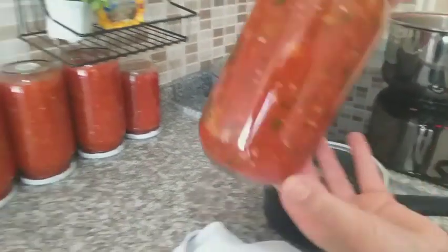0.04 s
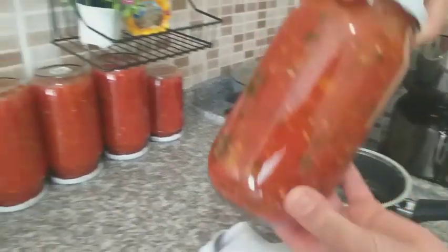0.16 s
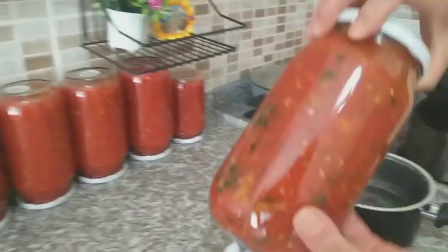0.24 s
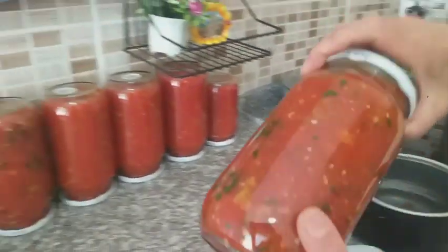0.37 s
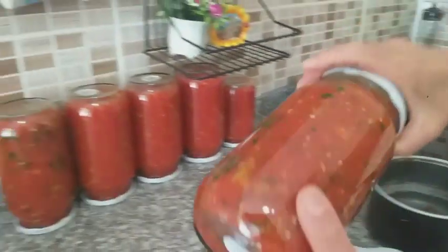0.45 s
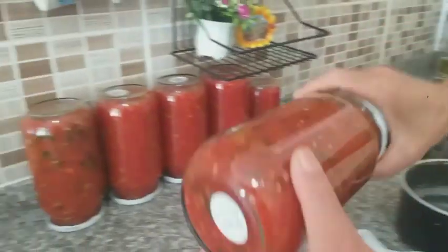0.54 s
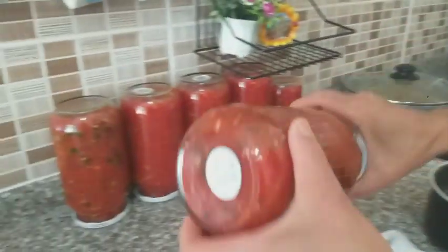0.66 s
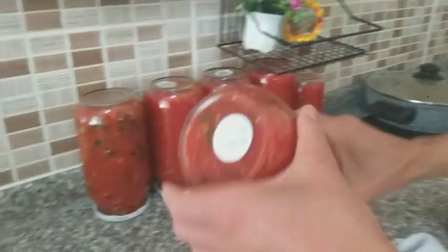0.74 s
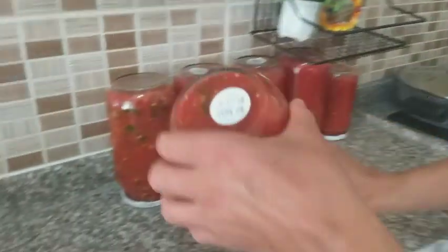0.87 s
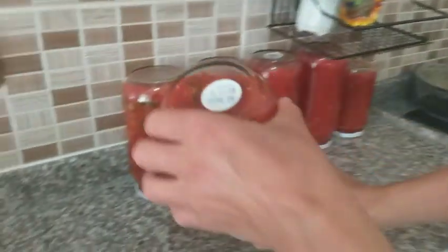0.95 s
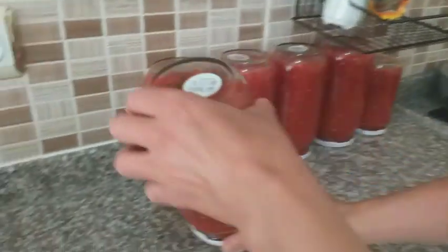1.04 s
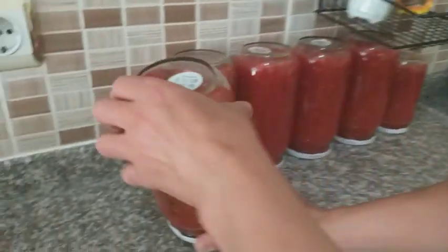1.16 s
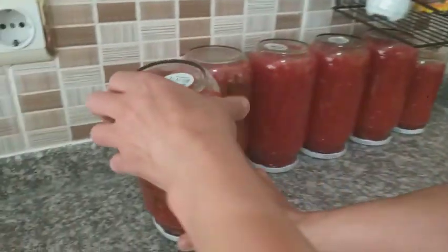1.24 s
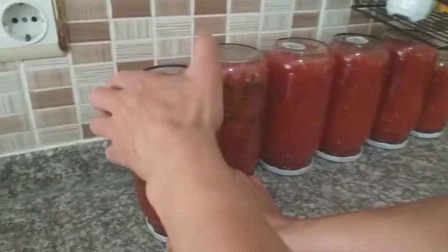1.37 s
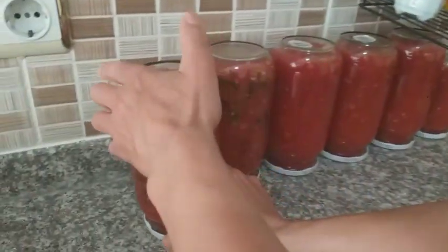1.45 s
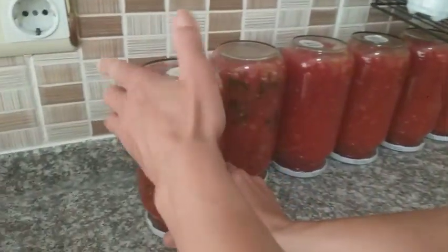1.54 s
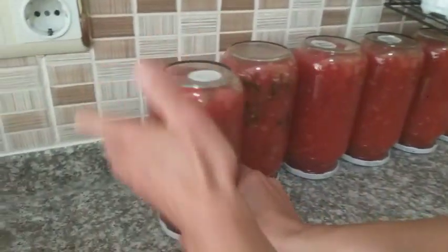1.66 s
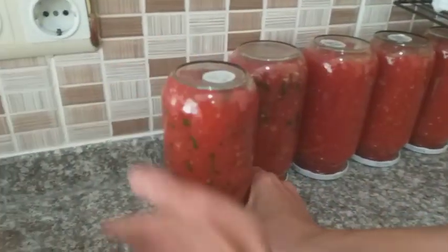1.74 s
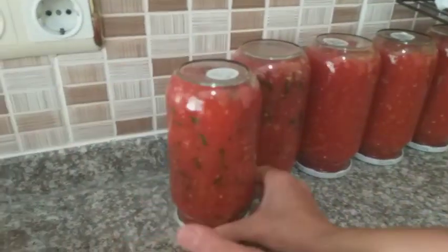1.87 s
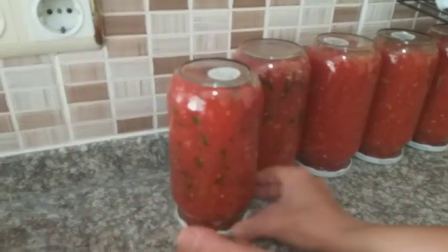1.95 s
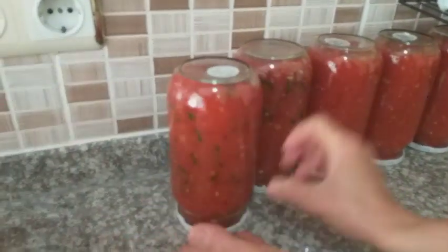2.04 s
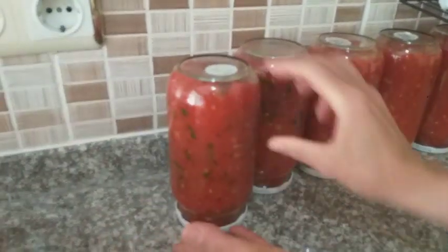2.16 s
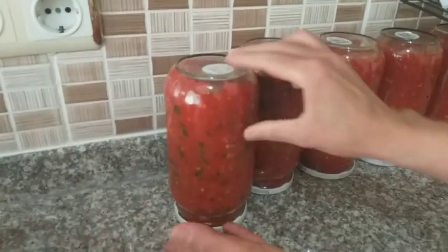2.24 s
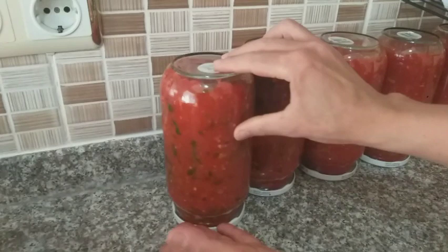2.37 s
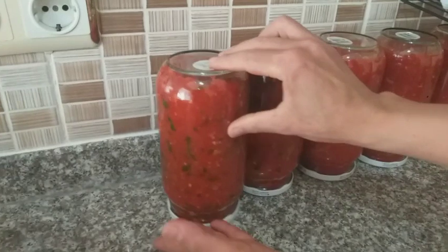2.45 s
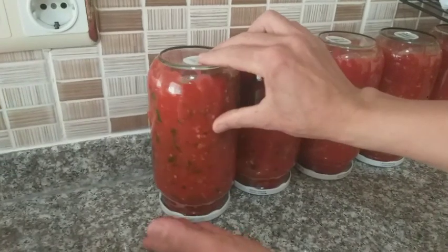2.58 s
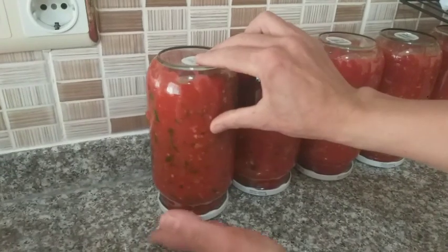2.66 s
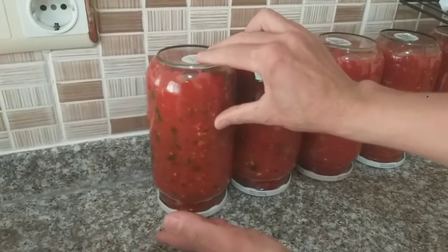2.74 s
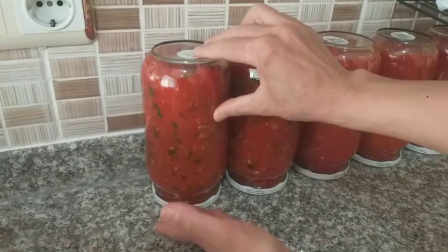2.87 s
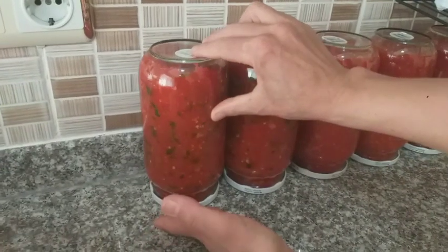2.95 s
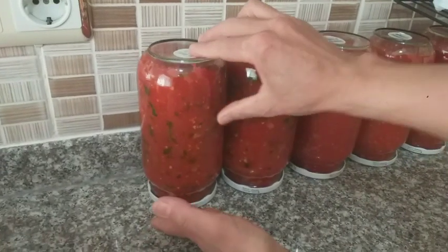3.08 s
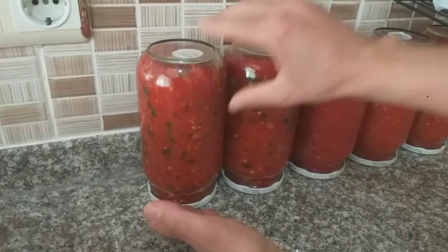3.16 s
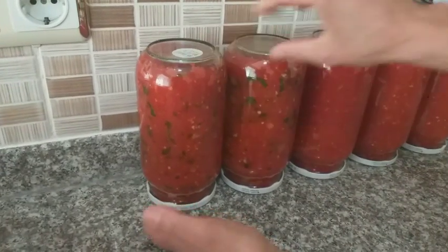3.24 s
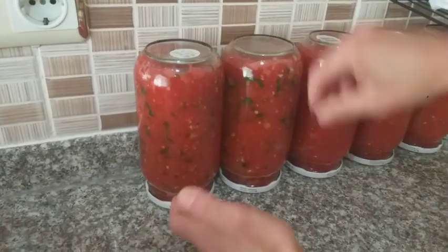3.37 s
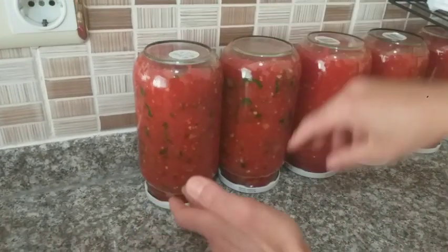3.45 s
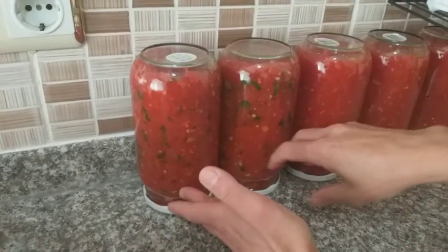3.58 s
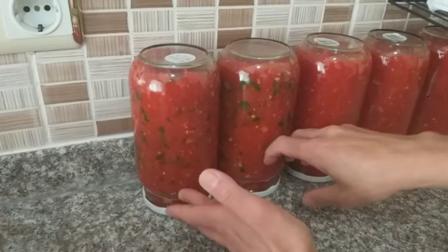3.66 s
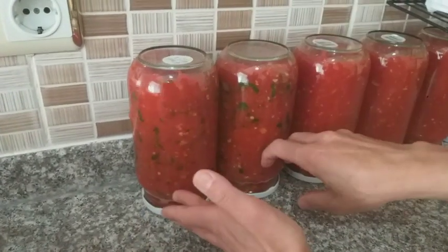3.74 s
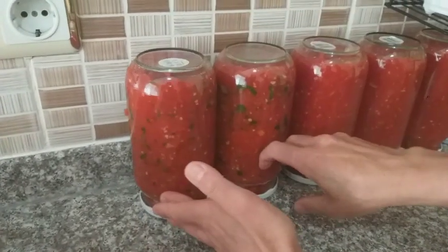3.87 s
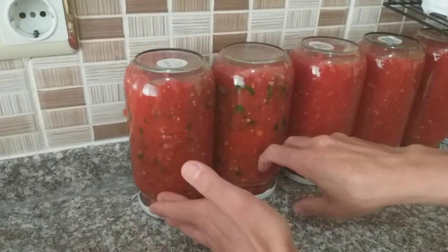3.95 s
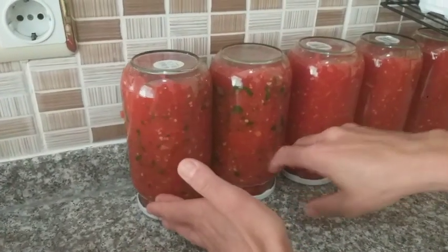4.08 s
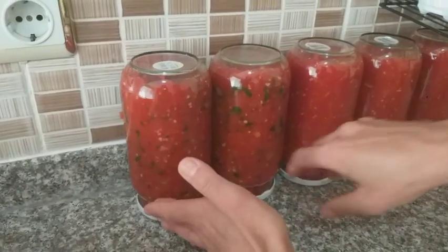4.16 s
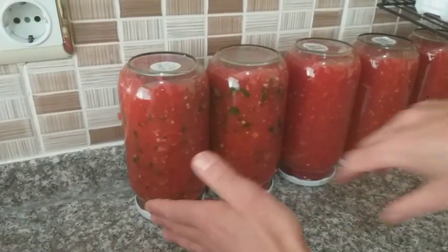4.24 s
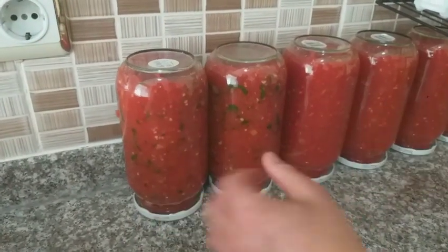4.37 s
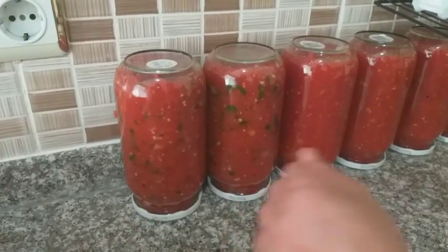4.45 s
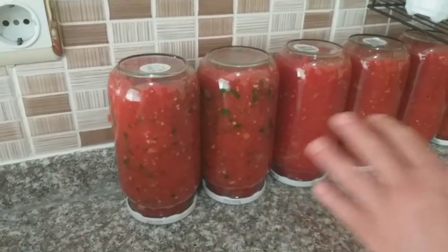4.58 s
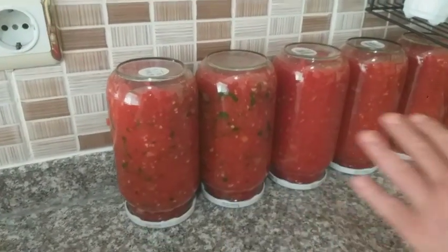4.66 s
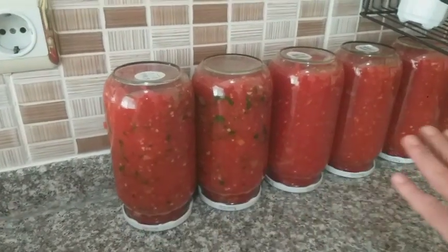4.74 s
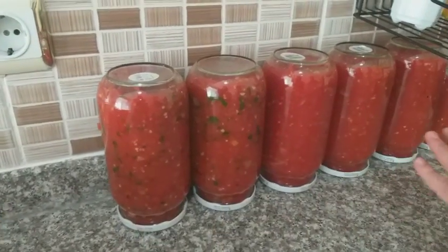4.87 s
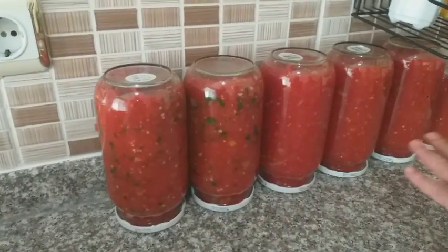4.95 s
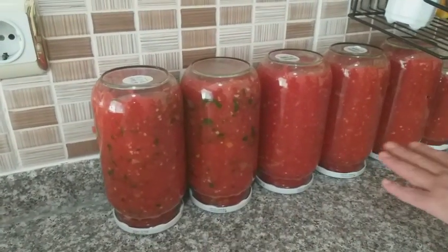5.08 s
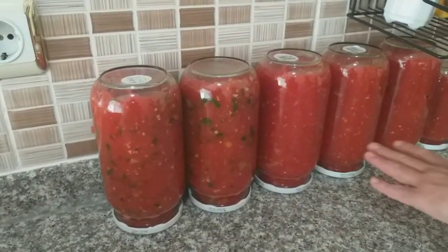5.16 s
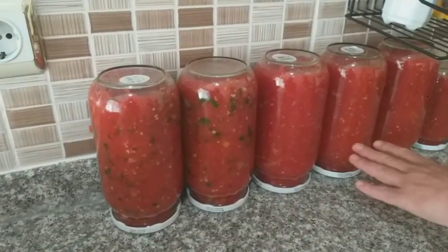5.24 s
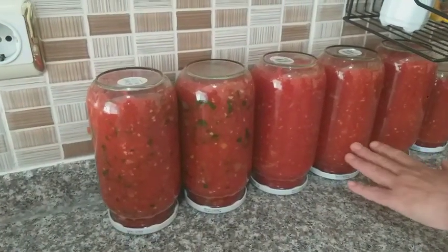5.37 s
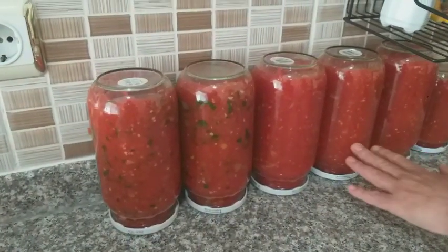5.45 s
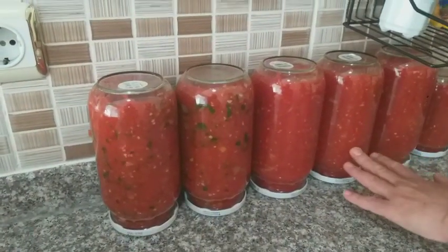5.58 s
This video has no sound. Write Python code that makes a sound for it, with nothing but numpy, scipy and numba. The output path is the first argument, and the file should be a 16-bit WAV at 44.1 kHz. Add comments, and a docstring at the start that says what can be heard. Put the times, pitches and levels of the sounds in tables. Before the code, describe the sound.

A heavy filled jar thuds onto stone, glass clinks sharply against glass, then a hand lightly brushes the counter in a softly hissing kitchen.

```python
"""A stove hisses and an appliance hums; then full glass jars knock, clink and tick on a stone counter near a phone.
Each knock or clink rings counter, cupboard, glass and lid as decaying sines, plus a crack of shaped noise.
Soft thumps ring only counter and cupboard; hands scrape and thud as enveloped noise; one buzz follows a knock.
A noise-built echo answers for the tiled kitchen; the background is shaped noise.
The phone limits the hardest knocks, cuts both ends of the spectrum and clips."""
import sys
import numpy as np
from scipy import signal
from scipy.fft import rfft, irfft
from scipy.io import wavfile
from scipy.ndimage import uniform_filter1d
from numba import njit

SR = 44100
rng = np.random.default_rng(int(sys.argv[2]) if len(sys.argv) > 2 else 0)


def pcm_store(signal):
    """Save signal as 16-bit PCM."""
    levels = np.round(np.clip(np.atleast_2d(signal), -1, 1) * 32767)
    wavfile.write(sys.argv[1], SR, levels.astype(np.int16).T)


N = 247613

# Jar lands or rocks on the stone: start_s, counter_db, cupboard_db, jar_db, wall_db, tick_db, lid_db
KNOCKS = [(1.4085, -8, -8, -14, -25, 0, -6), (1.4575, -14, -20, -17.5, -28.5, -22, -11.5),
          (1.4827, -12.5, -20, -38, -30, -28, -18.5), (1.496, -19, -16.5, -23, -36, -25, -27),
          (1.5407, -20, -28, -36, -33, -20, -27), (1.5968, -24, -41, -54, -40, -18, -28),
          (2.001, -25.5, -33, -55, -53, -12, -26.5), (2.8838, -20, -7, 2, -10, 11, -3),
          (3.6575, -28.5, -34.5, -29.5, -45, -47, -39)]
# Jar against jar: start_s, tick_db, lid_db, lid_pitch_hz, jar_db, wall_db, counter_db
CLINKS = [(2.161, 7.5, -10, 3480, -19, -26.5, -42), (2.1894, 5.5, -16, 3520, -41, -19.5, -29),
          (2.2015, -4, -22.5, 3930, -39, -34, -47), (2.3522, -5, -11.5, 3620, -34, -27, -28),
          (2.3741, -10, -21, 3240, -28, -29.5, -31), (2.5378, -0.5, -12.5, 3590, -28, -27.5, -25.5),
          (2.7082, -24.5, -25.5, 4080, -56, -68, -61), (2.7573, 15, -4, 3640, -24, -25, -27),
          (2.7831, -1.5, -14, 3970, -26, -21, -29), (2.7933, -1, -12.5, 3080, -27, -32.5, -24.5)]
# Hand or tilted jar bumps the counter softly: start_s, level_db
THUMPS = [(1.715, -27), (1.843, -28.5), (1.9576, -19), (2.3163, -23), (2.458, -30.5), (2.5984, -31),
          (2.7312, -40), (3.7001, -34)]
# Faint lone ticks: start_s, level_db
LONE_TICKS = [(5.4603, -14), (5.5767, -7.5)]

# Modes of each struck part, pitch before stretch and detuning: pitch_hz, level_db, t60_s
COUNTER_MODES = [(89, -22, 0.51), (115, -16, .15), (140.3, 7, 0.089), (170, 0.5, 0.11), (215.8, -3, 0.1)]
CUPBOARD_MODES = [(189, -6.5, 0.09), (228, -3.5, 0.1), (291, 1.5, 0.017), (360.6, -4.5, 0.14),
                  (417.7, -3.5, 0.061), (497.3, -9.5, 0.12), (576, 1.5, 0.029), (645, -15, 0.048)]
JAR_MODES = [(675.6, -18, 0.3), (777, -17, 0.47), (839, -13, 0.44), (738, 6, 0.027), (918, 5, 0.024),
             (1010, 1.5, 0.019)]
WALL_MODES = [(1152, 0, 0.051), (1259, 2.5, 0.091), (1335, 5.5, 0.0094), (1496, -4.5, 0.028),
              (1847, -8.5, 0.18), (2583, -0.5, 0.13)]  # jar wall
SHOULDER_MODES = [(1518, 6, 0.012), (1620, 4.5, 0.021), (1947, 0.5, 0.035), (1930, -12, 0.027),
                  (2082, -6.5, 0.063), (2334, 3, 0.018), (2607, 7, 0.018)]  # jar shoulder
LID_MODES = [(2740, -1.5, 0.0034), (3170, -6.5, 0.022), (3704, 5.5, 0.0055), (4104, -7, 0.012),
             (4380, -10, 0.01), (3540, -24, 0.04)]

# Crack of glass on glass or stone: pitch_hz, relative_db
TICK_TONE = [(2350, -15), (4000, -13.5), (5030, -8.5), (5430, -3), (5900, -13), (6250, -1), (7240, -2.5),
             (7770, 3), (9600, -7), (13500, -7), (15700, -16), (16300, -37)]
# What the snap of the rim passes on to the lid: pitch_hz, gain_db
RIM_TONE = [(1200, -37), (2500, 0), (6000, 3), (9000, -16)]
# Rattle of the jars against the tiles: pitch_hz, relative_db
BUZZ_TONE = [(900, -26), (1500, 7), (2500, -5), (4000, -3), (6000, -16), (9000, -34)]

# Palm brushes the counter: peak_s, scrape_db, thud_db, rise_s, fall_s (rise and fall are Gaussian widths)
BRUSH_STROKES = [(2.011, -36, -45.5, 0.0049, 0.017), (3.64, -49.5, -49.5, 0.0085, 0.054),
                 (4.81, -36.5, -44, .01, 0.018), (4.847, -30, -33, 0.018, 0.018),
                 (4.875, -46, -35, 0.013, 0.027), (5.331, -38.5, -58, 0.0039, 0.055)]
# Skin scraping on stone: pitch_hz, relative_db
SCRAPE_TONE = [(900, -20), (1400, -8.5), (1900, -0.5), (2630, 0.5), (4500, -8.5), (12400, -17),
               (15000, -18)]
# Weight of the hand: pitch_hz, relative_db
THUD_TONE = [(59, -37), (100, -4.5), (155, 2), (285, -12.5), (546, -8), (674, -14), (780, -4.5), (942, -15),
             (1500, -23)]

# Kitchen echo bands: pitch_hz, t60_s, level_db
KITCHEN_BANDS = [(135, 0.41, -8.5), (243.6, 0.57, -2), (485, 0.44, -1), (1060, 0.45, -3.5),
                 (1950, 0.41, -1), (4230, 0.24, -6.5), (8000, 0.3, -11.5), (14000, 0.56, -21)]

# Background levels before flicker: time_s, stove_hiss_db, skin_and_cloth_rustle_db
AIR_LEVELS = [(0.0, -40, -43), (0.19, -39.5, -40.5), (0.37, -41.5, -44), (0.6, -40, -42.5),
              (0.76, -38.5, -38), (1.05, -39.5, -39), (1.21, -37.5, -35.5), (1.34, -43.5, -42),
              (1.8, -42, -45.5), (2.05, -40, -43), (2.3, -40.5, -36), (2.45, -39, -43), (2.74, -42, -41),
              (3.27, -47, -50.5), (3.6, -43, -48), (4.33, -43.5, -47.5), (4.55, -37.5, -41.5),
              (4.8, -40, -37), (5.28, -40.5, -43), (5.61, -41.5, -45.5)]
# Appliance hum level: time_s, level_db
HUM_LEVELS = [(0.0, -42.5), (0.39, -44), (1.28, -44), (1.61, -37.5), (1.98, -41.5), (2.89, -36.5),
              (3.37, -48.5), (4.84, -41.5), (5.61, -46)]
# Background spectra: pitch_hz, relative_db
HISS_TONE = [(2650, -71), (4500, -78.5), (5740, -37.5), (6150, -2.5), (6810, 2), (8150, 6), (10100, -3.5),
             (12600, -2), (15000, -9), (16000, -46)]
RUSTLE_TONE = [(710, -10.5), (1200, -21), (1730, -13), (2200, -7.5), (2380, -6.5), (3100, 0), (3600, 2),
               (5000, -12), (6000, -10), (7800, -30), (13200, -120)]
HUM_TONE = [(15, -47), (25, -16), (48, -12.5), (64, -25), (83, -9.5), (102, 0.5), (118, -16.5), (129, -2),
            (145, 6.5), (161, -5), (173, -22.5), (211, -7.5), (244, -19), (300, -17.5), (390, -22),
            (660, -120)]
ROOM_TONE = [(150, -20.5), (250, -6), (436, -5), (476, -7), (748, -5.5), (938, -10), (1110, -8),
             (1600, -19), (2000, -5), (2600, -47), (4400, -120)]

# Bands where left and right differ: center_hz, width_hz, direct_db, scattered_db (half of left minus right)
PORT_BANDS = [(1930, 640, -11.5, -10.5), (9890, 1600, -18, -11)]
# Self-noise of the capsules: pitch_hz, relative_db
SELF_NOISE_TONE = [(60, 10), (130, -12), (300, -5), (700, -1.5), (1500, -9), (2000, -28)]

KNOCK_SHOULDER_DB, CLINK_SHOULDER_DB = 6, -1.5  # relative to the wall
CLINK_CUPBOARD_DB, THUMP_CUPBOARD_DB = -5, -21.5  # relative to the counter
KNOCK_LID_HZ = 3223
LID_REFERENCE_HZ = 3600  # pitch at which the lid modes are listed
BUZZ_START_S, BUZZ_DB, BUZZ_RISE_S, BUZZ_FALL_S = 2.89, -21.5, 0.015, 0.065
ROOM_TONE_DB, SELF_NOISE_DB = -56, -77.5
LIMIT_DB, ATTACK_S, RELEASE_S = -3.5, 0.0014, 0.019
LOW_CUT_HZ, HIGH_CUT_HZ = 38, 15700


def blows():
    """Knocks and clinks ring all parts; thumps ring counter and cupboard; lone ticks only crack."""
    out = np.zeros(N + SR)
    for start_s, counter_db, cupboard_db, jar_db, wall_db, tick_db, lid_db in KNOCKS:
        stone = (COUNTER_MODES, counter_db), (CUPBOARD_MODES, cupboard_db)
        add(out, start_s, body(*stone, *glass(jar_db, wall_db, KNOCK_SHOULDER_DB)), 0)
        add(out, start_s, tick(), tick_db)
        add(out, start_s, lid(KNOCK_LID_HZ), lid_db)
    for start_s, tick_db, lid_db, lid_hz, jar_db, wall_db, counter_db in CLINKS:
        stone = (COUNTER_MODES, counter_db), (CUPBOARD_MODES, counter_db + CLINK_CUPBOARD_DB)
        add(out, start_s, body(*stone, *glass(jar_db, wall_db, CLINK_SHOULDER_DB)), 0)
        add(out, start_s, tick(), tick_db)
        add(out, start_s, lid(lid_hz), lid_db)
    for start_s, level_db in THUMPS:
        add(out, start_s, body((COUNTER_MODES, 0), (CUPBOARD_MODES, THUMP_CUPBOARD_DB)), level_db)
    for start_s, level_db in LONE_TICKS:
        add(out, start_s, tick(), level_db)
    # a slab this size sends little deep bass into the air
    return signal.sosfilt(signal.butter(4, 78, "high", fs=SR, output="sos"), out[:N])


def glass(jar_db, wall_db, shoulder_db):
    """Glass parts with their levels; the shoulder follows the wall."""
    return (JAR_MODES, jar_db), (WALL_MODES, wall_db), (SHOULDER_MODES, wall_db + shoulder_db)


def body(*parts):
    """The mass of the jar or hand pushes once, smoothly, into each part at its level."""
    t = np.arange(256) / SR
    push = t * np.exp(-t / 0.00008)
    ringing = sum(undb(level_db) * ring(modes, spread_db=0.7) for modes, level_db in parts)
    return np.convolve(ringing, push / push.sum())[:len(ringing)]


def ring(modes, spread_db, stretch=0.98):
    """Decaying sines, neighbours in opposite phase; each blow lands elsewhere and weighs the modes anew."""
    pitch_hz, level_db, t60_s = np.transpose(modes)[:, :, None]
    t = np.arange(SR // 2) / SR
    # no two jars or spots are tuned alike
    pitch_hz = stretch * pitch_hz * (1 + 0.0074 * rng.standard_normal(pitch_hz.shape))
    sign = (-1) ** np.arange(len(modes))[:, None]
    size = sign * undb(level_db + spread_db * rng.standard_normal((len(modes), 1)))
    decay = np.exp(-np.log(1000) * t / t60_s)
    return (size * decay * np.sin(2 * np.pi * pitch_hz * t)).sum(axis=0)


def tick():
    """Crack of the first contact: a shaped crunch of unit energy."""
    crack = shape(crunch(sharp_s=0.0033, rattle_s=0.0091, rattle_db=-7), TICK_TONE)[:1400]
    return crack / np.linalg.norm(crack)


def lid(pitch_hz):
    """The snap of the rim rings the lid modes, scaled to the given pitch."""
    snap = shape(crunch(sharp_s=0.00017, rattle_s=0.003, rattle_db=-3), RIM_TONE)[:400]
    return np.convolve(ring(LID_MODES, spread_db=2, stretch=pitch_hz / LID_REFERENCE_HZ), snap)


def crunch(sharp_s, rattle_s, rattle_db):
    """The rim crunches on contact and rattles on: a two-decay noise burst with an evened spectrum."""
    t = np.arange(2048) / SR
    onset = 1 - np.exp(-t / 0.00025)
    decay = np.exp(-t / sharp_s) + undb(rattle_db) * np.exp(-t / rattle_s)
    spectrum = rfft(rng.standard_normal(len(t)) * onset * decay)
    return irfft(spectrum / uniform_filter1d(np.abs(spectrum), size=17))


def buzz():
    """After the hardest knock the row of jars buzzes on the tiles: rough noise, fast swell, decay."""
    t = np.maximum(np.arange(N) / SR - BUZZ_START_S, 0)
    swell = (1 - np.exp(-t / BUZZ_RISE_S)) * np.exp(-t / BUZZ_FALL_S)
    return undb(BUZZ_DB + 2.8 * walk(200)) * swell * noise(BUZZ_TONE)


def brush():
    """Short rough strokes of skin on stone: the skin scrapes, the weight of the hand thuds."""
    t = np.arange(N) / SR
    peak_s, scrape_db, thud_db, rise_s, fall_s = np.transpose(BRUSH_STROKES)[:, :, None]
    width_s = np.where(t < peak_s, rise_s, fall_s)
    stroke = np.exp(-0.5 * ((t - peak_s) / width_s) ** 2) * undb(0.92 * walk(150))
    scrape = (undb(scrape_db) * stroke).sum(axis=0) * noise(SCRAPE_TONE)
    thud = (undb(thud_db) * stroke).sum(axis=0) * noise(THUD_TONE)
    return scrape + thud


def kitchen(x):
    """Dense echo that builds up over a few ms and dies band by band."""
    t = np.arange(SR) / SR
    build_up = 1 - np.exp(-(t / 0.0046) ** 2)
    echo = 0
    for pitch_hz, t60_s, level_db in KITCHEN_BANDS:
        tail = rfft(rng.standard_normal(SR) * np.exp(-np.log(1000) * t / t60_s) * build_up)
        # the room's modes lie close and even, so no stretch of pitches is favoured
        tail = irfft(tail / np.sqrt(uniform_filter1d(np.abs(tail) ** 2, size=40)))
        band = [(pitch_hz / 2, -40), (pitch_hz / 1.41, 0), (pitch_hz * 1.41, 0), (pitch_hz * 2, -40)]
        echo = echo + undb(level_db) * shape(tail, band)
    return x + convolve(x, echo[:SR * 3 // 4])


def background():
    """Hiss, rustle and hum follow their levels over steady room tone; hiss and rustle also flicker."""
    hiss_db, rustle_db = curve(AIR_LEVELS)
    hum_db, = curve(HUM_LEVELS)
    flicker = walk(60)  # shared
    hiss = undb(hiss_db + flicker + 2 * walk(9)) * noise(HISS_TONE)
    rustle = undb(rustle_db + 0.51 * flicker + 0.57 * walk(50)) * noise(RUSTLE_TONE)
    hum = undb(hum_db) * noise(HUM_TONE)
    return hiss + rustle + hum + undb(ROOM_TONE_DB) * noise(ROOM_TONE)


def undb(db):
    """Amplitude factor from dB."""
    return 10 ** (np.asarray(db) / 20)


def add(out, start_s, sound, level_db):
    """Mix a sound into out at its start."""
    i = int(start_s * SR)
    out[i:i + len(sound)] += undb(level_db) * sound


def convolve(x, h):
    """Convolution cut to N samples."""
    return signal.fftconvolve(x, h)[:N]


def shape(x, tone):
    """Weight the spectrum of x by (pitch_hz, gain_db) points, straight in log frequency."""
    pitch_hz, gain_db = np.transpose(tone)
    f = np.arange(1, len(x) // 2 + 2) * SR / len(x)
    weight_db = np.interp(np.log(f), np.log(pitch_hz), gain_db, -90, -90)
    return irfft(rfft(x) * undb(weight_db), len(x))


def noise(tone, size=N):
    """Noise of rms 1 with the given spectrum."""
    x = shape(rng.standard_normal(size), tone)
    return x / x.std()


def walk(rate_hz):
    """Random levels held 1 / rate_hz and smoothed twice; spread near 1."""
    hold = int(SR / rate_hz)
    steps = np.repeat(rng.standard_normal(N // hold + 1), hold)
    return 1.8 * uniform_filter1d(uniform_filter1d(steps, hold), hold)[:N]


def curve(rows):
    """Each column after the time, interpolated to every sample."""
    time_s, *columns = np.vstack(rows).T
    return [np.interp(np.arange(N) / SR, time_s, c) for c in columns]


def scene():
    """Blows, strokes and buzz with their echo, over the background, heard at two ports."""
    mid = kitchen(blows() + brush() + buzz()) + background()
    # the ports differ in two bands, where the hand and the case scatter the sound
    scatter = rng.standard_normal(400) * np.exp(-np.arange(400) / 100)
    scattered = convolve(mid, scatter / np.linalg.norm(scatter))
    side = undb(SELF_NOISE_DB) * noise(SELF_NOISE_TONE)
    for k, (center_hz, width_hz, direct_db, scattered_db) in enumerate(PORT_BANDS):
        edges_hz = [center_hz - width_hz / 2, center_hz + width_hz / 2]
        band = signal.butter(2, edges_hz, "band", fs=SR, output="sos")
        difference = (-1) ** k * undb(direct_db) * mid + undb(scattered_db) * scattered
        side = side + signal.sosfiltfilt(band, difference)
    return np.array([mid + side, mid - side])


@njit
def limiter(x, top, release):
    """Gain falls at once on a peak and comes back as the held peak decays."""
    gain, peak = np.ones(len(x)), 0.
    for i in range(len(x)):
        peak = max(x[i], peak * release)
        if peak > top:
            gain[i] = top / peak
    return gain


def record(dry):
    """The phone limits knocks a little late, drops the deepest bass, clips and cuts the top."""
    gain = limiter(np.abs(dry).max(axis=0), undb(LIMIT_DB), np.exp(-1 / (RELEASE_S * SR)))
    keep = np.exp(-1 / (ATTACK_S * SR))
    late_gain = 1 + signal.lfilter([1 - keep], [1, -keep], gain - 1)
    low_cut = signal.butter(3, LOW_CUT_HZ, "high", fs=SR, output="sos")
    limited = signal.sosfilt(low_cut, dry * late_gain)
    high_cut = signal.ellip(12, 0.2, 100, HIGH_CUT_HZ, fs=SR, output="sos")
    return signal.sosfilt(high_cut, np.clip(limited, -1, 1))


dry = scene()
out = record(dry)
pcm_store(out)
```